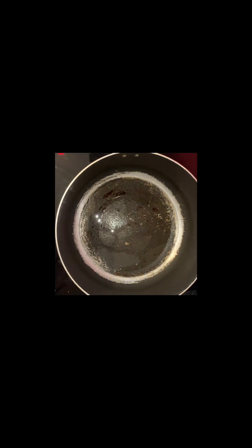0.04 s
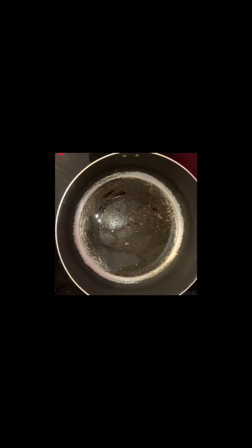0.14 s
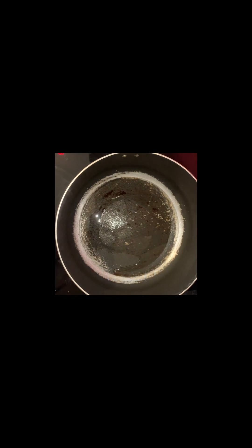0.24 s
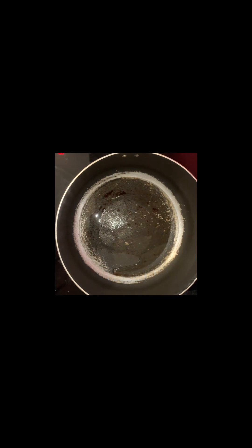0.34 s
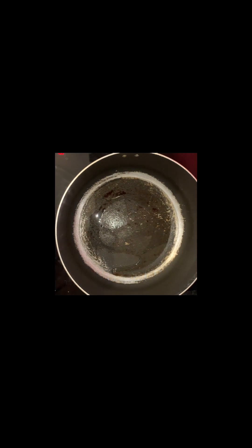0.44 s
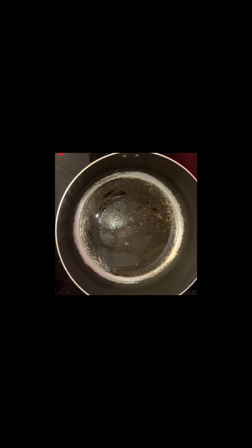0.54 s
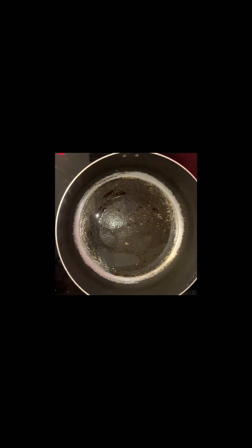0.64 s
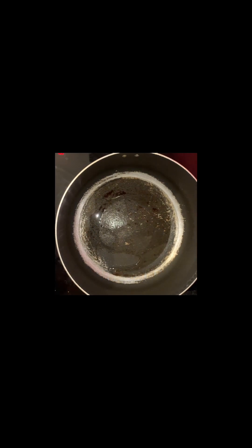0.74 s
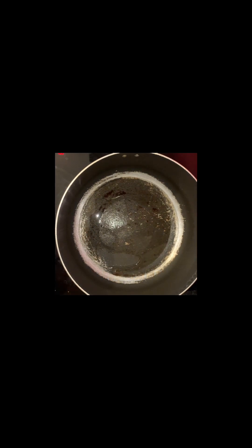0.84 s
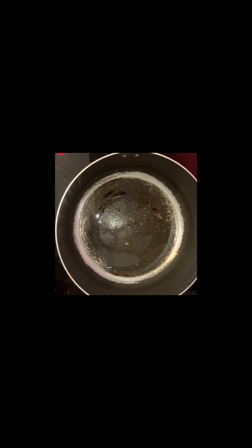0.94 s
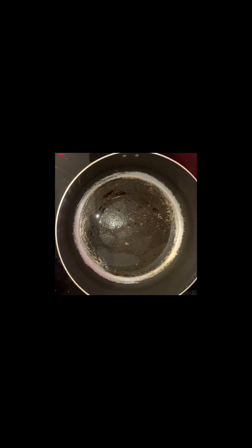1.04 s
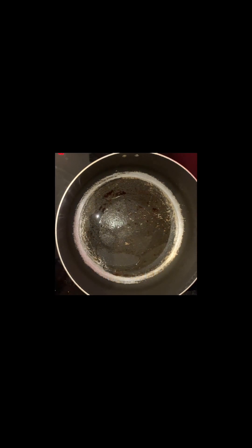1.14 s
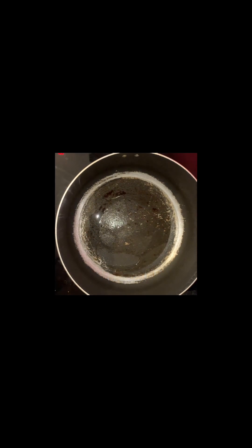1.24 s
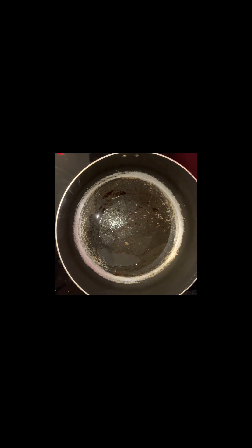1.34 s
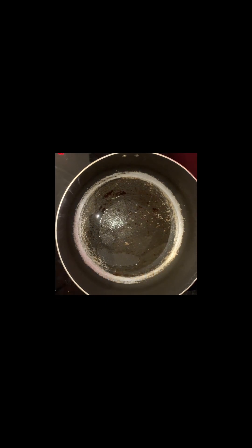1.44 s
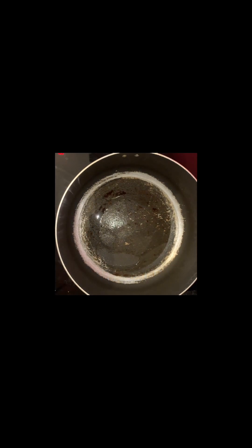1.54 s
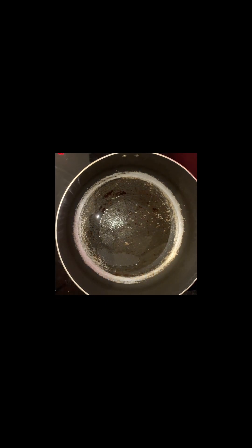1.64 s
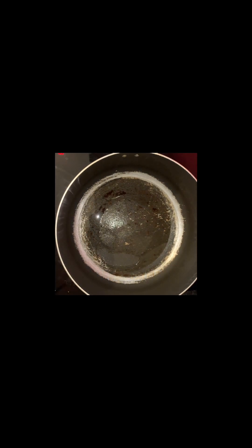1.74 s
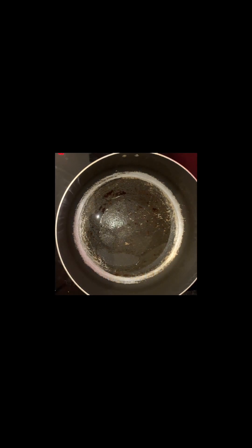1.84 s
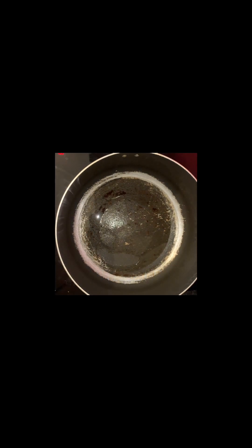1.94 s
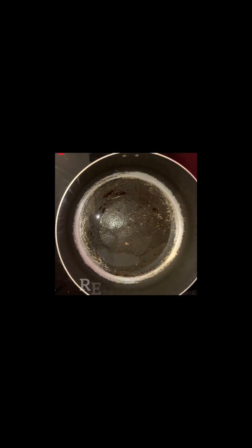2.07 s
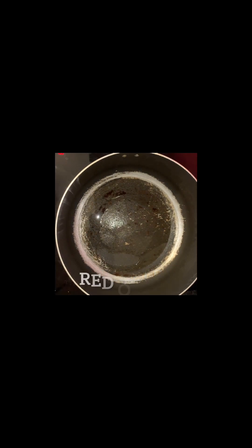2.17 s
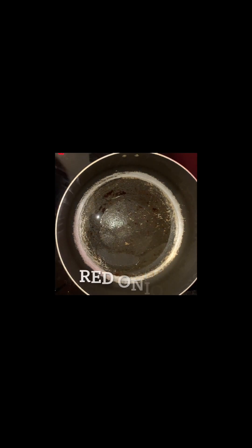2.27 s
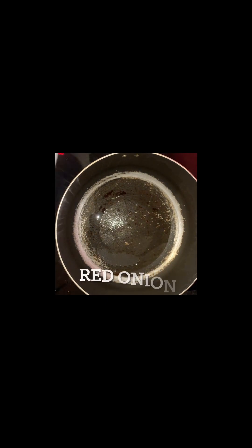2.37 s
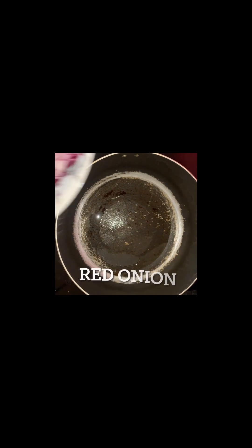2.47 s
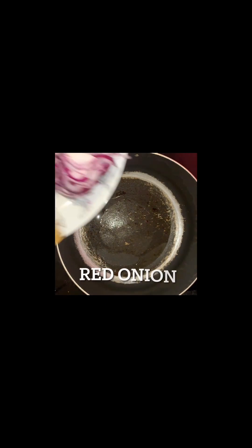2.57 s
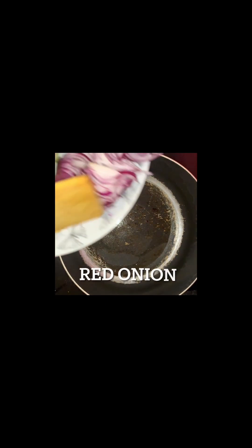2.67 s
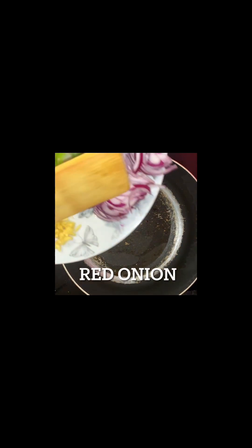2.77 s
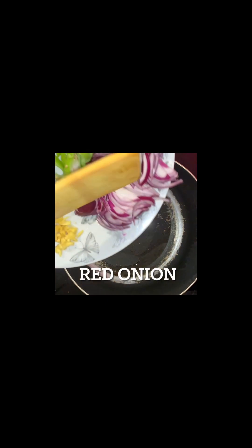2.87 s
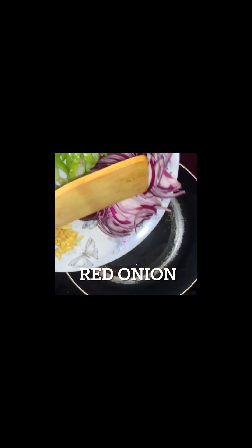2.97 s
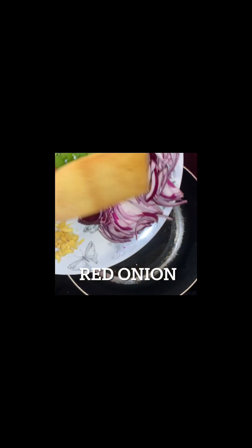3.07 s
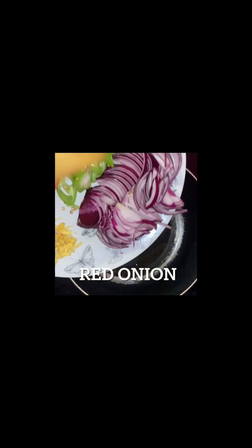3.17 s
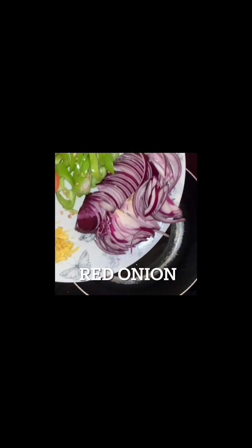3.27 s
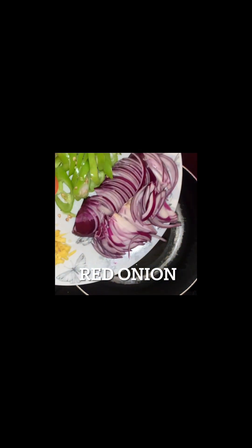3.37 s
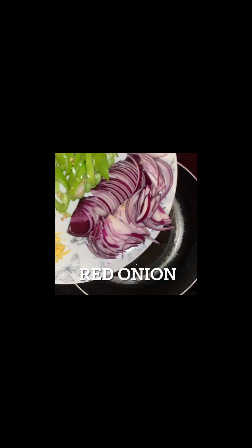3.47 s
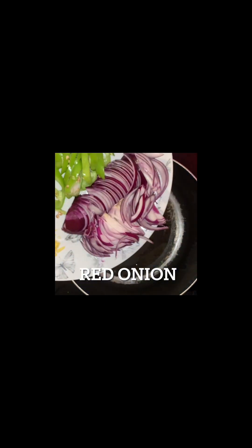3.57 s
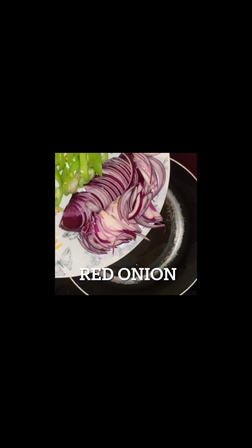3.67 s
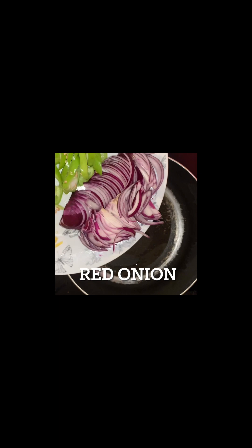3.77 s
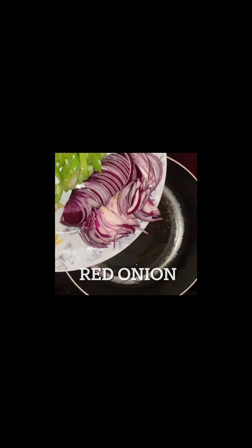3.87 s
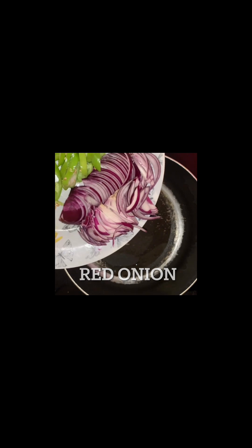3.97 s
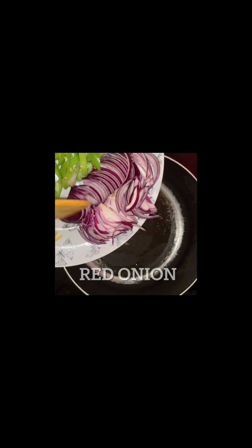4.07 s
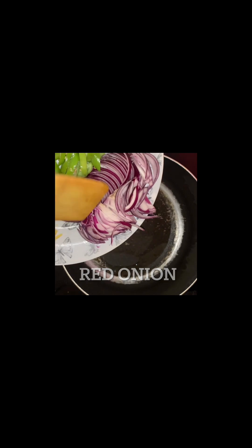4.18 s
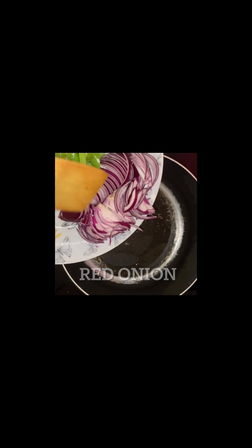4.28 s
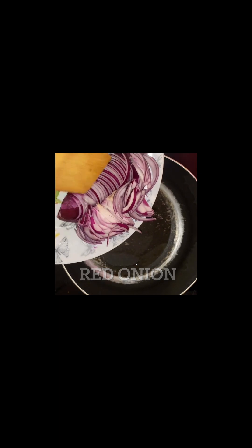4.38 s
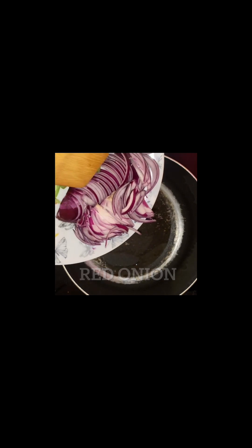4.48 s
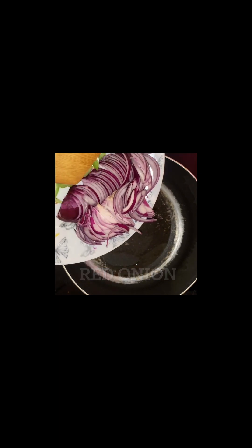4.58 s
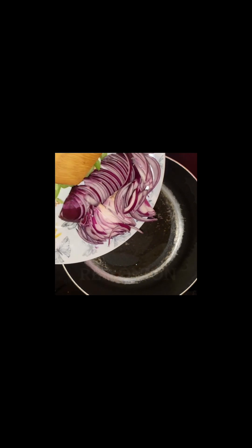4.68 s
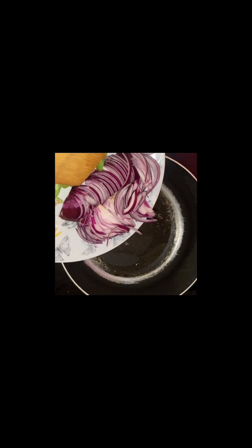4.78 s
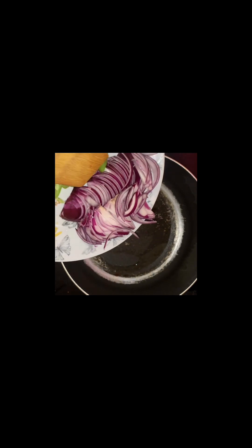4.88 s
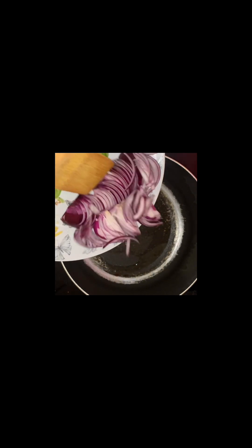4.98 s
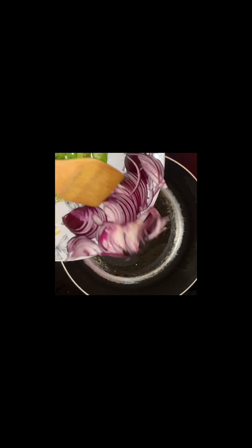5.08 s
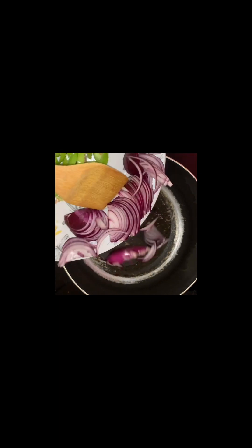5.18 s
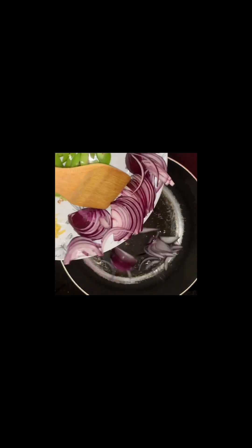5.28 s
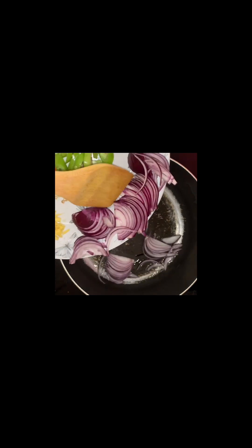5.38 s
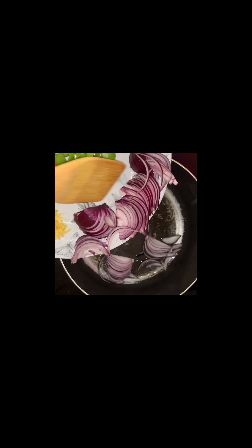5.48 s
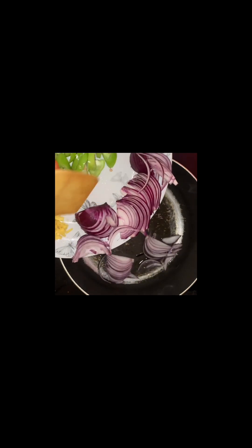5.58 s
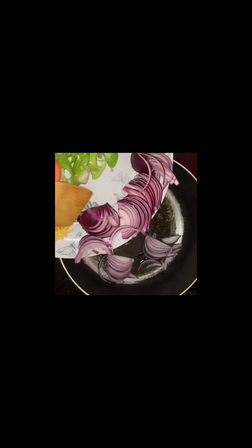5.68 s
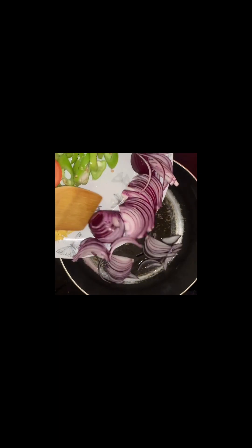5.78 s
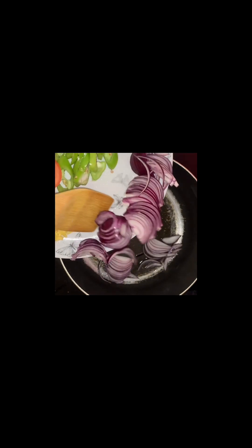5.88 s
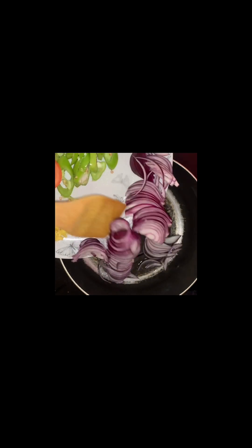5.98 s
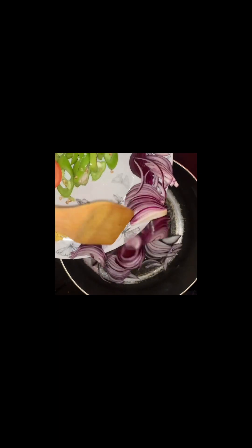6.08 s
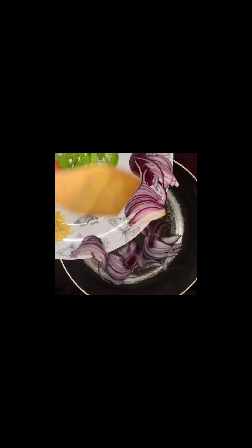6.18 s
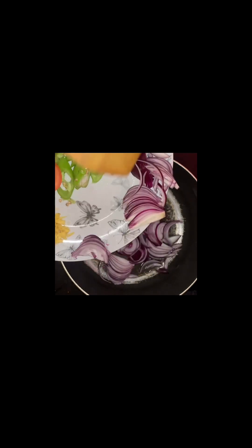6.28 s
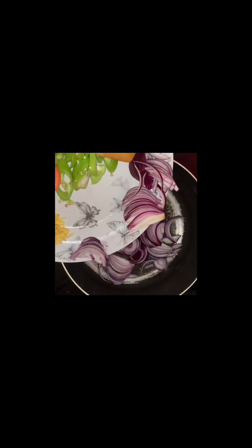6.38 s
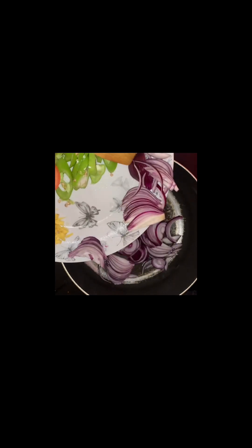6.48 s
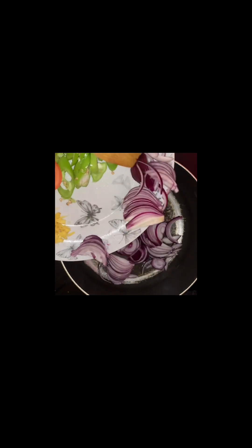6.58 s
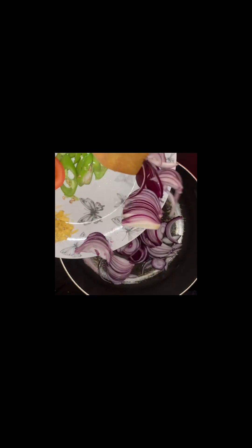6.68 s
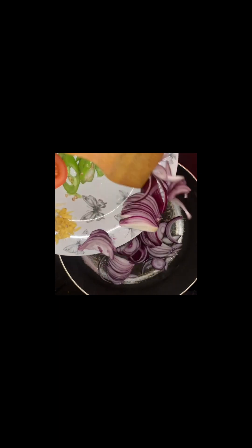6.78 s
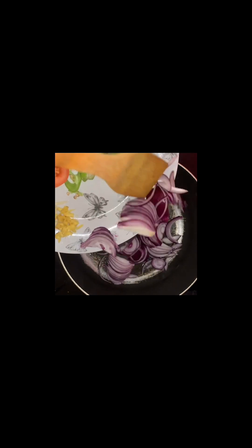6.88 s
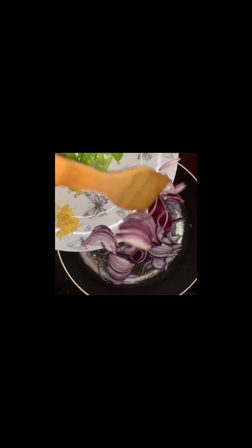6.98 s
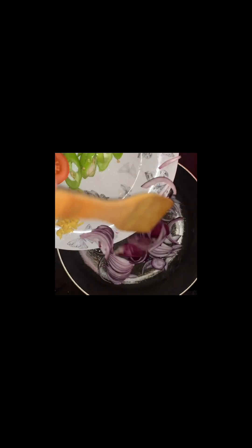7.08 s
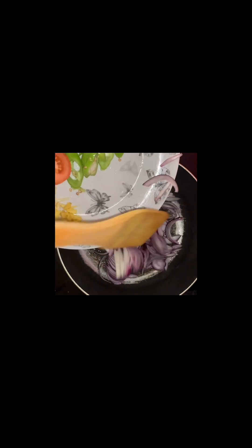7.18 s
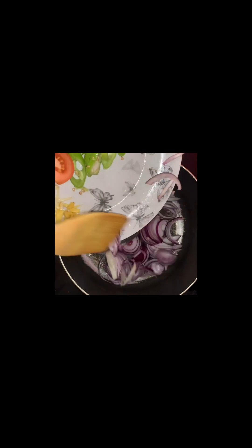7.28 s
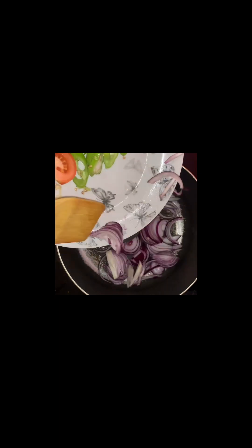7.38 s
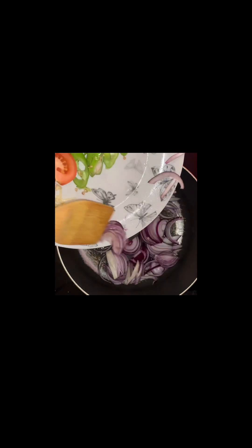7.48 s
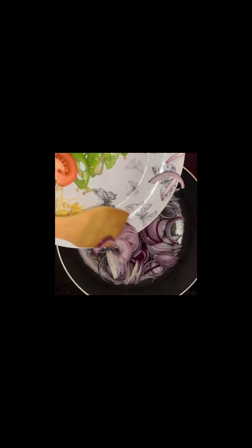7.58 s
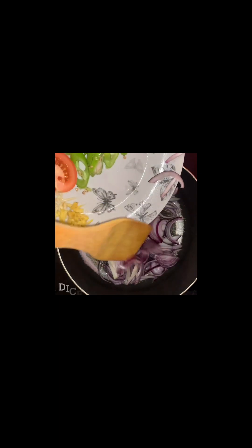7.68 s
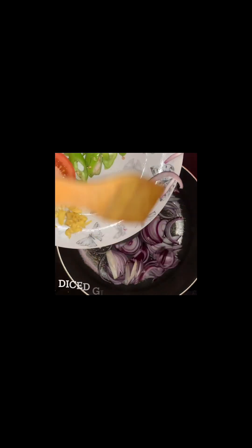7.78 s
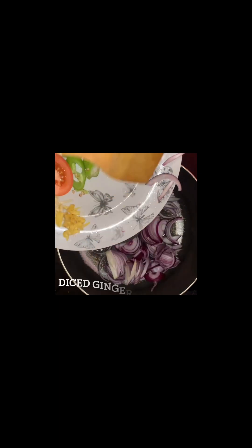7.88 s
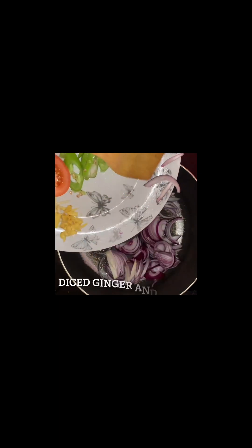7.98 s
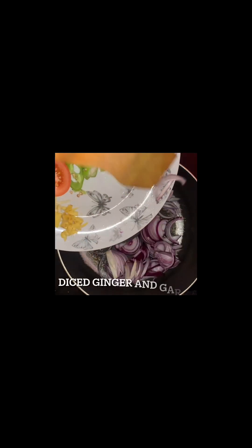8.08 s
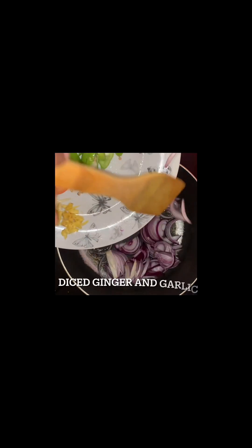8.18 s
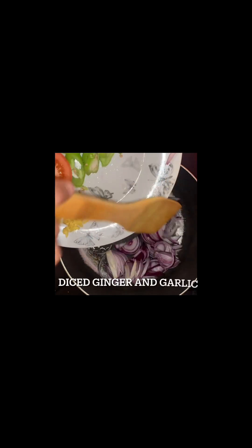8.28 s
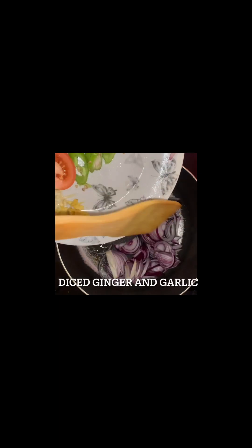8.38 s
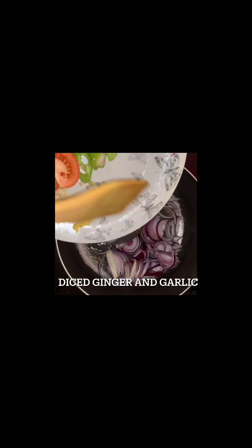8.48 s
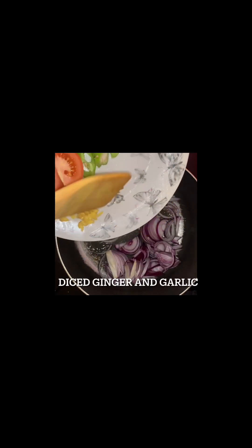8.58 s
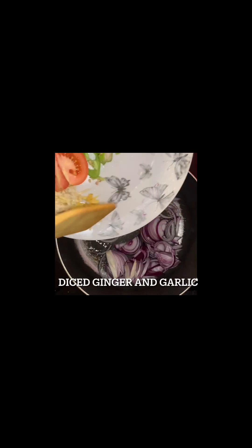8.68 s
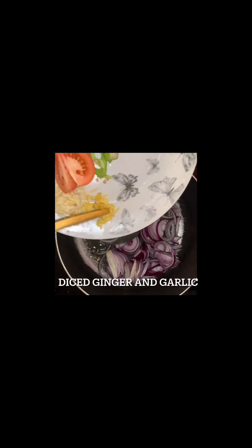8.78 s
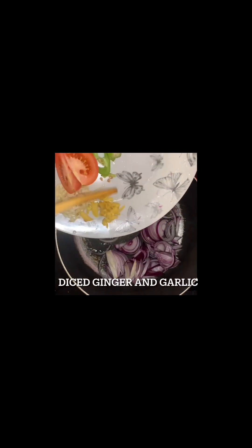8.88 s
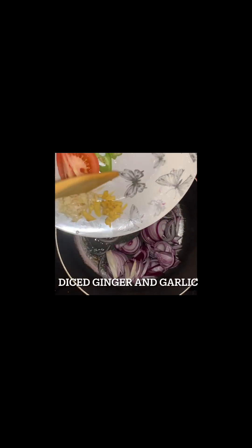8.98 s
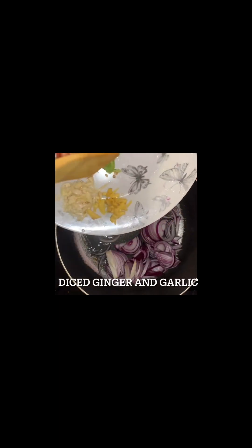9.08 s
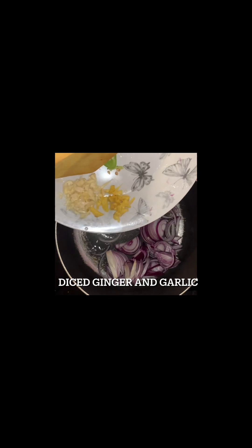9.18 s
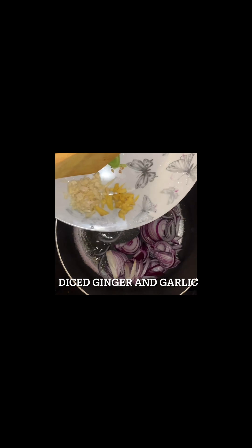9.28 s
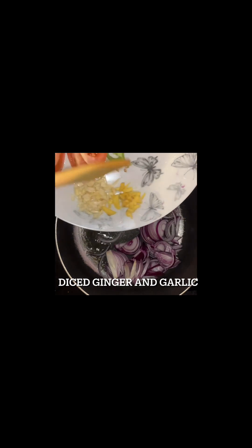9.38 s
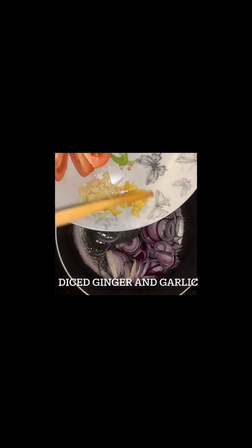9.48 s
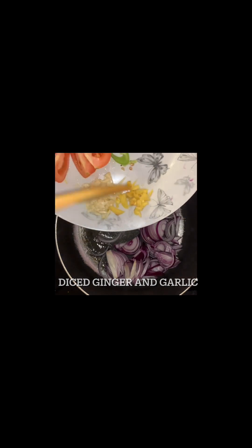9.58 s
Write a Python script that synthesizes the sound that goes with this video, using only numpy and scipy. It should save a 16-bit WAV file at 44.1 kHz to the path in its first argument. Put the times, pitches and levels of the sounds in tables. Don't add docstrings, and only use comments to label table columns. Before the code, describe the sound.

Sliced onions drop from a plate into a hot oiled pan, bursting into bright popping sizzle with wooden spatula knocks, after a near-silent lead-in.

```python
import sys
import numpy as np
from scipy import signal
from scipy.fft import rfft, irfft, next_fast_len
from scipy.io import wavfile
from scipy.ndimage import uniform_filter1d

SR = 44100
rng = np.random.default_rng(int(sys.argv[2]) if len(sys.argv) > 2 else 0)


def level_to_linear(level):
    exponent = np.asarray(level, float) / 20
    return 10 ** exponent


def put_to_file(sound):
    columns = np.atleast_2d(sound).T
    safe = np.clip(columns, -1, 1)
    whole_steps = np.round(safe * 32767)
    wavfile.write(sys.argv[1], SR, whole_steps.astype(np.int16))


N = 424683
TIME = np.arange(N) / SR

# [f/Hz, level/dB]
RUMBLE_COLOUR = [(15, -34), (25, -11), (49, -3.5), (70, -7), (110, 0), (128, -14), (204, -23.5),
                 (340, -78.5)]
# [f/Hz, level/dB]
SHAKE_COLOUR = [(22, -30), (45, -4), (143, -0.5), (177, -11.5), (235, -12), (400, -17), (520, -25.5),
                (880, -120)]
# [t/s, level/dB, hold/s]
SHAKES = [
    (0.0, -55.5, 0.0085),
    (0.54, -56, 0.078),
    (1.159, -45.5, 0.0089),
    (5.202, -39, 0.074),
    (5.902, -38, 0.011),
    (6.166, -38.5, 0.0096),
    (6.901, -49, 0.04),
    (7.053, -41, 0.1),
]
# [f/Hz, level/dB]
AIR_COLOUR = [(110, -30), (180, -10), (599, -13), (888, -17.5), (2540, -22), (6380, -40), (9280, -32.5),
              (16000, -37)]
# [f/Hz, level/dB]
EARLY_AIR_COLOUR = [(150, -31.5), (250, -5), (493, -19), (618, -16), (1100, -23.5), (1800, -35.5),
                    (13200, -37), (16000, -43)]
# [f/Hz, level before the scene changes/dB, level after/dB]
MAINS_HUM = [(202.2, -71.5, -91), (307, -100, -85.5), (604.3, -85, -88.5)]
# [t/s, level/dB]
STIRRING = [
    (0.0, -104),
    (0.54, -90),
    (2.17, -79.5),
    (2.55, -82),
    (4.51, -83),
    (5.12, -76),
]
# [f/Hz, width/Hz, level/dB]
PLATE_MODES = [(2500, 111, -2), (3650, 220, -6.5), (4500, 180, -2), (6300, 410, 0), (7840, 120, 2),
               (11400, 300, -7.5)]
# [t/s, peak level/dB, strongest plate tone f/Hz, length/s]
SHIFTS = [(0.219, -69, 2250, 0.11), (0.56, -67.5, 2930, 0.11), (0.902, -65, 3080, 0.045),
          (0.945, -56.5, 6800, 0.038), (1.507, -64.5, 5520, 0.081), (1.613, -62.5, 4300, 0.15),
          (2.23, -67.5, 7540, 0.14), (2.368, -64, 2700, 0.12), (2.488, -60, 2380, 0.11),
          (2.588, -60.5, 2570, 0.12), (2.759, -63, 7400, 0.037), (2.822, -61.5, 5880, 0.064),
          (2.89, -70.5, 1660, 0.22), (2.959, -60.5, 5060, .09), (2.92, -68, 2340, 0.12),
          (2.99, -61, 2600, 0.074), (3.136, -64, 2500, 0.062), (3.247, -65, 6300, 0.072),
          (3.32, -74.5, 3510, 0.083), (3.42, -75.5, 2480, 0.069), (3.576, -63.5, 3650, 0.057),
          (3.773, -74.5, 2530, 0.085), (3.878, -55, 2280, 0.057), (4.134, -62, 2500, 0.081),
          (4.405, -58.5, 6700, 0.058), (4.49, -56.5, 6500, 0.098), (4.539, -48.5, 7900, 0.039),
          (4.706, -62, 6750, 0.041), (4.736, -67, 7840, 0.11), (4.904, -54, 7300, 0.082),
          (4.944, -60, 2820, 0.1), (5.017, -63, 6860, 0.1)]
# [t/s, level/dB]
GAS_LEAK = [
    (.42, -100),
    (.46, -79),
    (.55, -79),
    (.63, -80.5),
]
# [t/s, peak level/dB]
KNOB_SNAPS = [
    (0.6388, -30.5),
    (0.6416, -13.5),
    (0.6452, -14),
    (1.635, -46),
]
# [f/Hz, width/Hz, level/dB]
KNOB_MODES = [(1740, 380, -3.5), (2960, 200, -0.5), (3240, 120, -1), (3404, 150, -2), (3800, 200, -6.5),
              (4470, 260, -5), (7100, 350, -9), (8800, 500, -7), (1398, 320, -9), (11100, 400, -16),
              (13000, 700, -15.5)]
# [f/Hz, level/dB, t60/s]
PAN_MODES = [(102, -12.5, 0.49), (232, -3, 0.29), (359, 10.5, 0.057), (495, 16, 0.098), (706, 11, 0.11),
             (1002, 6, 0.037), (1070, 14, 0.049), (1317, 1, 0.18), (1800, 14.5, 0.18), (1974, 8, 0.06),
             (2750, -3.5, 0.055), (3993, -7.5, .05), (738, -0.5, 0.081), (890, 1.5, 0.12)]
# [t/s, peak level/dB, knock centre
# f/Hz, hardness 0-1]
THUDS = [(0.64, -41.5, 653.3, 0.6), (1.554, -55, 195, 0.86), (2.95, -55.5, 590, 0.2),
         (4.414, -59.5, 950, 0.5), (5.125, -26.5, 860, 0.47), (5.187, -34, 870, 0),
         (5.192, -28.5, 495, 0.6), (5.2, -34, 1780, 0.75), (5.245, -37, 1800, .2), (5.269, -17, 1710, 0.82),
         (5.2691, -24, 3930, 1), (5.277, -24, 790, 0.21), (5.296, -33.5, 770, 0), (5.864, -27, 1490, 1),
         (5.866, -23.5, 297, 0.22), (5.873, -27.5, 990, 0.3), (5.749, -25.5, 500, 1),
         (5.8612, -14, 900, 0.99), (5.899, -34, 460, 0.4), (6.137, -36.5, 1800, 1),
         (6.164, -25.5, 950, 0.9), (6.176, -23.5, 690, 0.27), (6.198, -32, 740, 0.8),
         (6.889, -42.5, 590, 0.84), (6.93, -37, 1800, 0.7), (6.939, -41, 230, 0.9),
         (7.0227, -23, 500, 0.48), (7.273, -34.5, 1070, 0.9), (7.975, -15, 610, 1), (7.976, -30, 240, 0.9),
         (7.9766, -35, 1900, 0.3), (8.394, -37.5, 1970, 0)]
# [t/s, peak level/dB, centre f/Hz]
BUMPS = [
    (0.697, -49.5, 238),
    (0.767, -54, 253),
    (2.972, -53.5, 102),
    (7.139, -50, 102),
    (7.17, -46, 107),
    (7.725, -49.5, 113),
    (8.278, -52, 143),
]
# [t/s, level/dB]
SLIDE_PRESSURE = [
    (1.068, -83),
    (1.078, -45),
    (1.11, -32),
    (1.145, -37.5),
    (1.152, -30),
    (1.18, -31.5),
    (1.23, -53.5),
    (1.32, -82),
]
# [f/Hz, level/dB]
GRATE_COLOUR = [(59, -33), (100, -13.5), (181, -21.5), (239, 9), (547, -17.5), (950, -5.5), (3000, -13),
                (5530, -39)]
# [f/Hz, width/Hz, level/dB]
IRON_MODES = [(247.4, 57, -7), (950, 200, 0.5), (1937, 350, -9), (2960, 110, -10), (3600, 200, -12.5)]
# [t/s, peak level/dB, tone f/Hz]
SLIPS = [(1.086, -34.5, 2090), (1.098, -36.5, 3200), (1.108, -31, 2590), (1.110, -29.5, 3500),
         (1.116, -29, 3410), (1.123, -31.5, 1030), (1.127, -36.5, 4560), (1.149, -29, 7340),
         (1.150, -27.5, 1970), (1.153, -35.5, 2960), (1.153, -34.5, 4060), (1.163, -29, 950),
         (1.169, -36.5, 3600), (1.171, -31.5, 2200), (1.179, -26.5, 950), (1.156, -27.5, 880),
         (1.167, -30.5, 1920), (1.174, -28, 930), (1.181, -34.5, 1020), (1.198, -37.5, 960),
         (1.236, -43.5, 1110)]
# [t/s, peak level/dB, f/Hz]
DROPLETS = [(4.7247, -48.5, 6750), (4.782, -47, 7900), (4.8045, -55, 7530), (4.823, -50, 7650),
            (5.0125, -64, 7100), (5.0423, -58, 7380), (5.0844, -60, 9640), (5.141, -36, 4200),
            (5.505, -32, 3500), (5.525, -34, 3740), (6.9997, -16, 3680)]
# [t/s, peak level/dB, f/Hz]
POPS = [(5.132, -31.0, 10970.0), (5.1415, -24.8, 13080.0), (5.1476, -24.7, 11350.0),
        (5.1547, -20.8, 11000.0), (5.1576, -25.9, 12030.0), (5.1906, -20.2, 10760.0),
        (5.2362, -21.1, 12530.0), (5.2432, -16.7, 12500.0), (5.2689, -11.4, 9300.0),
        (5.3974, -15.9, 7160.0), (5.4227, -22.5, 9320.0), (5.4554, -22.4, 5850.0), (5.4702, -25.2, 7890.0),
        (5.5755, -21.1, 9550.0), (5.5787, -26.4, 7450.0), (5.6576, -22.7, 6940.0), (5.6948, -22.1, 10550.0),
        (5.7401, -26.3, 8260.0), (5.8007, -23.5, 7220.0), (5.9044, -19.0, 7920.0), (6.0327, -23.2, 6650.0),
        (6.0578, -22.7, 13520.0), (6.0791, -18.5, 10530.0), (6.1364, -15.7, 7970.0), (6.2556, -7.4, 8970.0),
        (6.4942, -17.0, 7980.0), (6.5066, -12.0, 9770.0), (7.2398, -14.9, 12850.0),
        (7.3027, -15.0, 10530.0), (7.4753, -14.8, 12400.0), (7.509, -16.3, 10470.0),
        (7.5894, -17.2, 12030.0), (7.6348, -12.8, 7240.0), (7.7417, -11.3, 11750.0),
        (7.7575, -11.2, 7020.0), (7.7756, -12.5, 7830.0), (7.9062, -18.1, 5360.0), (8.074, -11.2, 10720.0),
        (8.1778, -16.4, 8890.0), (8.3359, -17.6, 11160.0), (8.451, -7.1, 13530.0), (8.4804, -15.3, 11780.0),
        (8.5835, -15.0, 10910.0), (8.6046, -15.0, 13790.0), (8.6239, -11.5, 10710.0),
        (8.6962, -17.5, 11880.0), (8.7443, -16.9, 12430.0), (8.7708, -16.3, 11100.0),
        (8.8063, -10.5, 12300.0), (8.8579, -12.1, 12580.0), (8.9198, -16.1, 12870.0),
        (8.9245, -14.3, 12050.0), (9.153, -19.1, 8320.0), (9.1875, -18.7, 6810.0), (9.2607, -11.9, 10700.0),
        (9.4142, -8.8, 9210.0), (9.4437, -10.2, 6880.0), (9.4477, -13.6, 10460.0),
        (5.1627, -30.0, 11210.0), (5.2255, -25.8, 11160.0), (5.2459, -22.2, 11620.0),
              (5.281, -20.8, 9630.0), (5.3225, -18.9, 14530.0), (5.3733, -23.4, 9960.0),
              (5.3837, -23.1, 13430.0), (5.4648, -25.8, 10150.0), (5.5, -28.9, 11190.0),
              (5.5204, -28.0, 10830.0), (5.6624, -27.4, 8910.0), (5.8654, -27.4, 9880.0),
              (6.1452, -21.5, 9090.0), (6.2584, -14.7, 11310.0), (6.3571, -16.8, 11780.0),
              (6.6402, -16.5, 10110.0), (6.7961, -18.6, 6780.0), (6.976, -17.7, 11230.0),
              (7.2354, -16.4, 12550.0), (7.2823, -18.1, 5900.0), (7.3189, -16.0, 11710.0),
              (7.3393, -18.2, 9410.0), (7.53, -18.6, 12160.0), (7.7527, -15.6, 7280.0),
              (7.7792, -19.3, 8180.0), (8.0264, -19.8, 12200.0), (8.3168, -18.8, 12790.0),
              (8.3634, -19.2, 9890.0), (8.4627, -17.8, 8170.0), (8.5617, -20.2, 12210.0),
              (8.5739, -20.3, 8880.0), (8.5898, -18.2, 10030.0), (8.6374, -20.6, 11150.0),
              (8.6682, -21.7, 10530.0), (8.7336, -20.6, 11410.0), (8.7394, -20.4, 8720.0),
              (8.8936, -18.8, 9410.0), (9.0872, -20.2, 7610.0), (9.1121, -21.0, 7340.0),
              (9.269, -20.9, 10050.0), (9.3355, -20.4, 8930.0), (9.4959, -20.5, 7670.0)]
# [t/s, peak level/dB, f/Hz]
CRACKS = [(5.455, -40, 4330), (5.471, -42, 3630), (5.571, -40, 4430), (6.076, -33, 3370),
          (6.1367, -27, 2640), (6.2197, -27, 3790), (6.6602, -46, 4120), (6.7973, -26, 4510),
          (7.104, -28, 3370), (7.3382, -24, 4140), (7.5128, -33, 4160), (7.633, -24, 3880),
          (7.9049, -28, 4100), (7.9448, -38, 4020), (8.0662, -40, 4190), (8.9031, -24.5, 3980),
          (8.9241, -24, 3980), (9.1171, -29, 3720), (9.261, -27, 4070), (9.4423, -22, 3680),
          (9.4699, -30, 2590), (9.5975, -32, 3360)]
# [delay/s, level/dB]
WALL_ECHOES = [
    (.0021, -5),
    (.0039, -1.5),
    (.0062, -10.5),
]
# [t/s, vigour level/dB]
STEAM = [(5.1, -63), (5.13, -59.5), (5.276, -33.5), (5.45, -41.5), (5.6, -43), (6.088, -39.5),
         (6.23, -28.5), (6.4, -33.5), (6.49, -32.5), (7.72, -34), (7.762, -33), (7.82, -34.5), (8.33, -34),
         (8.53, -36), (8.6, -40.5), (8.68, -35.5), (9.63, -34.5)]
# [f/Hz, level/dB]
FIZZ_COLOUR = [(1500, -55), (3000, -8), (4500, -1.5), (6200, 2), (9000, 6.5), (12500, 5), (15500, 5.5),
               (17000, -40.5)]
# [f/Hz, level/dB]
BUBBLING_COLOUR = [(200, -23), (700, -59), (1400, -3.5), (2400, 0.5), (3300, 2), (4000, 6), (5500, 3),
                   (9000, -7)]
# [f/Hz, t60/s]
ROOM_DECAY = [(100, 0.086), (500, 0.3), (2000, 0.21), (8000, 0.14), (16000, 0.17)]
# [f/Hz, level difference/dB]
LEFT_TILT = [(60, 0), (180, -3), (550, -2), (1650, -3), (4970, -0.5), (15000, 0.5)]
# [f/Hz, likeness 0-1]
LIKENESS = [(60, 0.94), (200, 0.94), (500, 0.17), (1700, 0.5), (3200, 0.23), (5200, 0.59), (9000, 0.74),
            (16000, 0.84)]
# [f/Hz, phase/rad]
LEAD_BEFORE = [(0, 0), (1700, .6), (3300, -.4), (4700, 1.6), (7300, .6), (9300, 2.2), (12000, 4.1),
               (14000, 6.2)]
# [f/Hz, phase/rad]
LEAD_AFTER = [(0, 0), (620, -.9), (1800, .3), (4400, 1.7), (5170, 3.14), (6000, 4.7), (12600, 9.42),
              (17000, 13.8)]

CHANGE_S, CHANGE_FADE_S = 1.75, 0.024
RUMBLE_DB, SHAKE_RISE_DB_PER_S, SHAKE_FALL_DB_PER_S = -64.5, 214.5, 106
EARLY_AIR_DB, AIR_BEFORE_DB, AIR_SINK_DB_PER_S, AIR_QUIET_DB, AIR_FRYING_DB = -77.5, -73.5, 8, -87, -75
PLATE_HELD_S, PLATE_FREE_DB, PLATE_DAMPED_DB = (2.72, 4.3), 4, -6
DULL_DB, DULL_DB_PER_S = -59, 494.5
SOFT_OCTAVES, HARD_OCTAVES, SOFT_MS, HARD_MS = 0.31, 1.38, 45, 7.4
BUMP_HARDNESS, RING_SHARE, OIL_HZ = 0.1, 0.19, 3600
BASS_LATE_S = 0.0029
RIM_HZ, RIM_DB, RIM_T60_S = 3840, -17, 0.042
SLIP_CYCLES = 7.2
POP_SPREAD_HZ = 2800
BOIL_DB, BOIL_FOLLOWS = -47.5, 0.67
FILL_S, FILL_DB = (5.75, 6.72), -7


def evened(x):
    return x / np.sqrt(np.mean(x ** 2) + 1e-20)


def read(points, hz):
    f, value = np.transpose(points)
    return np.interp(np.log(hz + 1), np.log(f + 1), value)


def curve(rows):
    s, db = np.transpose(rows)
    return np.interp(TIME, s, db, -140, -140)


def add(mix, s, sound):
    part = mix[round(s * SR):][:len(sound)]
    part += sound[:len(part)]


def coloured(x, points):
    size = next_fast_len(x.shape[-1], True)
    gain = level_to_linear(read(points, np.fft.rfftfreq(size, 1 / SR)))
    shaped = irfft(rfft(x, size) * gain, size)
    return evened(shaped[..., :x.shape[-1]])


def ring(x, hz, width):
    r = np.exp(-np.pi * width / SR)
    return signal.lfilter([1 - r, 0, r - 1], [1, -2 * r * np.cos(2 * np.pi * hz / SR), r * r], x)


def ring_twice(x, hz, width):
    return ring(ring(x, hz, width), hz, width)


def random_hits(size, per_s, spread_db):
    strength = level_to_linear(spread_db * np.minimum(rng.exponential(1, size), 4))
    return strength * (rng.random(size) < per_s / SR)


def slow_noise(size, width):
    return evened(uniform_filter1d(uniform_filter1d(rng.standard_normal(size), width), width))


def crackle(size, per_s, spread_db, tail_ms, smooth):
    hits = random_hits(size, per_s, spread_db)
    puffs = evened(signal.lfilter([1], [1, -np.exp(-1000 / tail_ms / SR)], hits))
    drift = level_to_linear(1.1 * slow_noise(size, 700))
    return (smooth + puffs) * drift * rng.standard_normal((2, size))


def kitchen():
    low, shake, air, early_air = (coloured(rng.standard_normal((2, N)), points)
                                  for points in (RUMBLE_COLOUR, SHAKE_COLOUR, AIR_COLOUR, EARLY_AIR_COLOUR))
    before = TIME < CHANGE_S
    hum = sum(level_to_linear(np.where(before, before_db, after_db)) * evened(ring(air, hz, 3.4))
              for hz, before_db, after_db in MAINS_HUM)

    low_db = np.full(N, float(RUMBLE_DB))
    for s, db, hold in SHAKES:
        rise_db = SHAKE_RISE_DB_PER_S * np.maximum(s - TIME, 0)
        fall_db = SHAKE_FALL_DB_PER_S * np.maximum(TIME - s - hold, 0)
        low_db = np.maximum(low_db, db - rise_db - fall_db)
    shaken = np.clip((low_db + 58.0) / 8, 0, 1)
    rumble = level_to_linear(low_db - 3.5) * (np.sqrt(1 - shaken) * low + np.sqrt(shaken) * shake)

    settling_db = np.maximum(AIR_BEFORE_DB - AIR_SINK_DB_PER_S * (TIME - CHANGE_S), AIR_QUIET_DB)
    air_db = np.select([before, TIME < STEAM[0][0]], [-140, settling_db], AIR_FRYING_DB)
    draught = level_to_linear(2.5 * slow_noise(N, 4000))
    return rumble + draught * (level_to_linear(air_db) * air + level_to_linear(EARLY_AIR_DB) * before * early_air) + hum


def rustle():
    size = 6 * SR
    drive = crackle(size=size, per_s=130, spread_db=-2.5, tail_ms=2.8, smooth=1.7)
    wide = coloured(drive, [(1200, -22.0), (2500, -9.0), (7000, -7.0), (11000, -10.0), (16000, -14.0)])
    dull = coloured(drive, [(300, -29.5), (900, -3.5), (2000, 5.0), (3500, -18.5), (8000, -44.5)])
    out, t = level_to_linear(curve(STIRRING)[:size] - 3.5) * wide, np.arange(8000) / SR
    for (s, db, hz, length), mix in zip(SHIFTS, rng.standard_normal((len(SHIFTS), len(PLATE_MODES)))):
        start = round(s * SR)
        at = slice(start, start + len(t))
        detune = 1 + 0.05 * mix[-1]
        modes = [(f * detune, 2.8 * width, tone_db + 2 * u)
                 for (f, width, tone_db), u in zip(PLATE_MODES, mix)]
        modes.append((hz, 300, 2.5))
        plate = sum(level_to_linear(tone_db) * evened(ring_twice(drive[:, at], f, width)) for f, width, tone_db in modes)
        held = PLATE_HELD_S[0] < s < PLATE_HELD_S[1]
        sound = level_to_linear(PLATE_FREE_DB if held else PLATE_DAMPED_DB) * evened(plate) + 0.87 * wide[:, at]
        sound += level_to_linear(min(DULL_DB + DULL_DB_PER_S * length, -3)) * dull[:, at]
        shape = np.minimum(t / 0.014, 1) * np.exp(-(t / length) ** 3)
        out[:, at] += level_to_linear(db - 10.0) * sound * shape
    return np.pad(out, ((0, 0), (0, N - size)))


def clicks():
    out, t = np.zeros(N), np.arange(9000) / SR
    snap = ring_twice(1. * (t == t[10]), 3100, 2100)
    snap = snap / abs(snap).max()
    for (s, db), hiss in zip(KNOB_SNAPS, rng.standard_normal((len(KNOB_SNAPS), len(t)))):
        rattle = evened(sum(level_to_linear(mode_db) * ring_twice(hiss, hz, width) for hz, width, mode_db in KNOB_MODES))
        scrape = evened(ring_twice(hiss, 3100, 2800)) * np.exp(-t / 0.003)
        add(out, s, level_to_linear(db - 1.5) * (1.7 * snap + 0.5 * scrape + 0.31 * rattle * level_to_linear(-60 * t / 0.055)))
    gas = evened(ring_twice(rng.standard_normal(N), 2900, 450))
    return out + level_to_linear(curve(GAS_LEAK)) * gas


def thuds():
    out, t = np.zeros(N), np.arange(12000) / SR
    hz = np.fft.rfftfreq(len(t), 1 / SR) + 1
    blows = THUDS + [(*bump, BUMP_HARDNESS) for bump in BUMPS]
    spots = rng.standard_normal((len(blows), len(PAN_MODES), 2)) * [2, .005]
    for (s, db, centre_hz, hard), spot in zip(blows, spots):
        grit = rng.standard_normal(len(t))
        octaves = SOFT_OCTAVES + hard * (HARD_OCTAVES - SOFT_OCTAVES)
        fade = np.exp(-t * 1000 / (SOFT_MS * (HARD_MS / SOFT_MS) ** hard))

        def reach(f):
            bell = np.exp(-.5 * (np.log2(f / centre_hz) / octaves) ** 2)
            return bell / np.sqrt(1 + (centre_hz / 2 / f) ** 6 + (f / OIL_HZ) ** 6)

        modes = np.zeros(len(t))
        for (f, mode_db, t60), (level_db, detune) in zip(PAN_MODES, spot):
            decay = (RING_SHARE + fade ** (f / centre_hz)) * level_to_linear(mode_db + level_db - 60 * t / t60)
            arrival = np.clip(t / (BASS_LATE_S * 500 / f), 0, 1) ** 2
            tone = np.sign(detune) * np.sin(2 * np.pi * f * (1 + detune) * t)
            modes += reach(f) * decay * arrival * tone
        knock = evened(irfft(rfft(grit) * reach(hz), len(t))) * (fade + 0.0054 * np.exp(-t / 0.01))
        rim = hard ** 2 * level_to_linear(RIM_DB - 60 * t / RIM_T60_S) * evened(ring(grit, RIM_HZ, 500))
        sound = modes / abs(modes).max() + 0.29 * knock + rim
        sound *= np.minimum(t / 0.0011, 1)
        add(out, s, level_to_linear(db + 1.5) * sound / abs(sound).max())
    return out


def nudge():
    size = 2 * SR
    drive = crackle(size=size, per_s=510, spread_db=2.0, tail_ms=3.2, smooth=0.55)
    iron = sum(level_to_linear(db) * evened(ring(drive, hz, width)) for hz, width, db in IRON_MODES)
    level_db = curve(SLIDE_PRESSURE)[:size]
    fine = coloured(drive, [(2000, -29.5), (5000, -12.0), (9000, -12.0), (12000, 11.0), (16000, -24.5)])
    scrape = level_to_linear(level_db) * (0.44 * coloured(drive, GRATE_COLOUR) + 0.55 * iron)
    sound = level_to_linear(-2.5) * (scrape + level_to_linear(1.9 * level_db + 8.0) * fine)
    t = np.arange(1500) / SR
    for s, db, hz in SLIPS:
        shape = np.exp(-t * hz / SLIP_CYCLES) * np.minimum(t / 0.00039, 1)
        add(sound[0], s, level_to_linear(db) * np.sin(2 * np.pi * hz * t) * shape)
    return np.pad(sound, ((0, 0), (0, N - size)))


def pops():
    out, t = np.zeros(N), np.arange(900) / SR
    bursts = POPS + DROPLETS + [(s, db + 4.5, hz) for s, db, hz in CRACKS]
    for (s, db, hz), hiss in zip(bursts, rng.standard_normal((len(bursts), len(t)))):
        spread_hz = min(POP_SPREAD_HZ, .5 * hz)
        snap = ring_twice(1. * (t == t[20]), hz, 2.6 * spread_hz)
        snap = snap / abs(snap).max()
        echoes = np.zeros(len(t))
        for (late, wall_db), u in zip(WALL_ECHOES, hiss):
            echoes += level_to_linear(wall_db) * np.sign(u) * np.roll(snap, round(late * (1 + .1 * u) * SR))
        bubble = 0.12 * np.sin(2 * np.pi * hz * t) * np.exp(-t * spread_hz * 0.25)
        splash = 0.16 * evened(ring(hiss, hz, 1.3 * spread_hz)) * level_to_linear(-60 * t / 0.035)
        add(out, s, level_to_linear(db + 1.5) * (snap + echoes + (bubble + splash) * np.minimum(t / 0.0005, 1)))
    return out


def spits(size, per_s, spread_db, cycles):
    out, t = np.zeros(size), np.arange(300) / SR
    hits = random_hits(size, per_s, spread_db)
    kind = rng.integers(0, 14, size)
    for k, hz in enumerate(np.geomspace(3600, 15000, num=14)):
        bubble = np.sin(2 * np.pi * hz * t * (1 + 8 * t)) * np.exp(-t * hz / cycles) * hz / 8000
        out += signal.oaconvolve(hits * (kind == k), bubble)[:size]
    return evened(out) * np.array([[1], [.6]])


def sizzle():
    size = N - 5 * SR
    fizz = coloured(crackle(size=size, per_s=660, spread_db=1.0, tail_ms=0.43, smooth=3.0), FIZZ_COLOUR)
    fizz += level_to_linear(-8.0) * spits(size=size, per_s=420, spread_db=4.5, cycles=7)
    drive = crackle(size=size, per_s=300, spread_db=3.0, tail_ms=4.9, smooth=4.04)
    hum = sum(level_to_linear(db) * ring(drive, hz, 9 / t60) for hz, db, t60 in PAN_MODES[3:9])
    bubbling = coloured(drive, BUBBLING_COLOUR) + level_to_linear(-16.5) * evened(hum)
    steam_db = curve(STEAM)[-size:]
    filling_db = np.interp(TIME[-size:], FILL_S, [FILL_DB, 0])
    boil_db = BOIL_DB + BOIL_FOLLOWS * (steam_db + 33.5) + filling_db
    sound = level_to_linear(steam_db + 1.0) * fizz + level_to_linear(boil_db + 6.5) * (steam_db > -100) * bubbling
    return np.pad(sound, ((0, 0), (N - size, 0)))


def room(x):
    shape = (2, SR // 2)
    taps = rng.choice([-1., 1.], shape) * (rng.random(shape) < .05) * (np.arange(SR // 2) > 200)
    hz, t, z = signal.stft(taps, SR, nperseg=256)
    tail = signal.istft(z * level_to_linear(-60 * t / read(ROOM_DECAY, hz)[:, None]), SR, nperseg=256)[1]
    return signal.fftconvolve(x[None], tail / np.linalg.norm(tail[0]), axes=1)[:, :N]


def ports(pair):
    size = next_fast_len(N)
    hz = np.fft.rfftfreq(size, 1 / SR)
    same, tilt = read(LIKENESS, hz), level_to_linear(read(LEFT_TILT, hz) / 2)
    shared, own = rfft(pair, size)
    left = irfft(shared * tilt, size)[:N]
    right = (same * shared + np.sqrt(1 - same ** 2) * own) / tilt
    before, after = (irfft(right * np.exp(-1j * np.interp(hz, *np.transpose(lead))), size)[:N]
                     for lead in (LEAD_BEFORE, LEAD_AFTER))
    return np.array([left, np.where(TIME < CHANGE_S, before, after)])


def scene():
    steady = kitchen() + rustle() + nudge() + sizzle()
    snaps, knocks, bursts = clicks(), thuds(), pops()
    wet = room(level_to_linear(-13.0) * knocks + level_to_linear(-8.0) * bursts + level_to_linear(-9.0) * snaps)
    right_only = 0.12 * np.roll(bursts, shift=12) + 0.48 * np.roll(knocks + snaps, shift=2)
    near = np.array([knocks + bursts + snaps, right_only])
    return ports(steady + near + wet)


def starved(x, under_db, ragged_db, bin_db, attack_db, from_hz):
    pair = np.array([x[0] + x[1], x[0] - x[1]]) / 2
    hz, t, z = signal.stft(pair[:, 129:], SR, "cosine", nperseg=2048, noverlap=1024)
    edges = np.r_[0:196:14, 196, 216, 240, 264, 292, 320:1024:32]
    band = np.searchsorted(edges, np.arange(len(hz)), "right") - 1
    power = np.add.reduceat(abs(z) ** 2, edges, axis=1) / np.bincount(band)[:, None]
    mood = rng.standard_normal((len(edges), len(t))) + .5 * rng.standard_normal(len(t))
    weak = (power < level_to_linear(2 * (under_db + ragged_db * mood)) * power[::-1])[:, band]
    weak |= abs(z) ** 2 < level_to_linear(2 * bin_db) * power.max(0)[band]

    treble = np.diff(x[0, 129:], 3, prepend=[0, 0])[:(N - 130) // 128 * 128]
    blocks = (treble.reshape(-1, 128) ** 2).mean(1) + 1e-14
    jump = blocks[8:] > level_to_linear(2 * attack_db) * uniform_filter1d(blocks, 8, origin=3)[7:-1]
    spared = np.isin(np.arange(len(t)), [(np.flatnonzero(jump) + ahead) // 8 for ahead in (10, 13)])
    dropped = weak & ~spared & (hz[:, None] > from_hz)
    kept = signal.istft(z * ~dropped, SR, "cosine", nperseg=2048, noverlap=1024)[1]
    mid, side = np.concatenate([pair[:, :129], kept], axis=1)[:, :N]
    return np.array([mid + side, mid - side])


def top_cut(x):
    return signal.sosfilt(signal.butter(12, 17020, fs=SR, output="sos"), x)


def record(dry):
    early, late = (signal.sosfilt(signal.butter(3, hz, "high", fs=SR, output="sos"), dry) for hz in (96, 36))
    dip = np.minimum(abs(TIME - CHANGE_S + 0.0053) / CHANGE_FADE_S, 1)
    changed = np.where(TIME < CHANGE_S, early, late) * dip
    band_limit = signal.firwin(255, 15900, window=("kaiser", 7), fs=SR)
    mix = signal.oaconvolve(changed, band_limit[None], "same")
    return top_cut(mix)


dry = scene()
out = record(dry)
put_to_file(out)
```